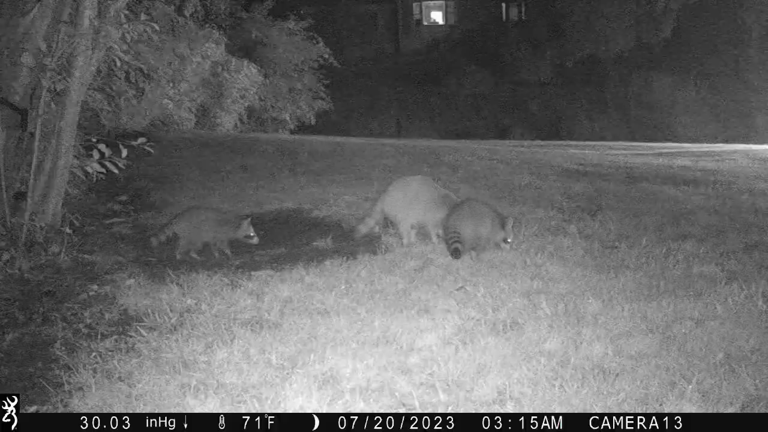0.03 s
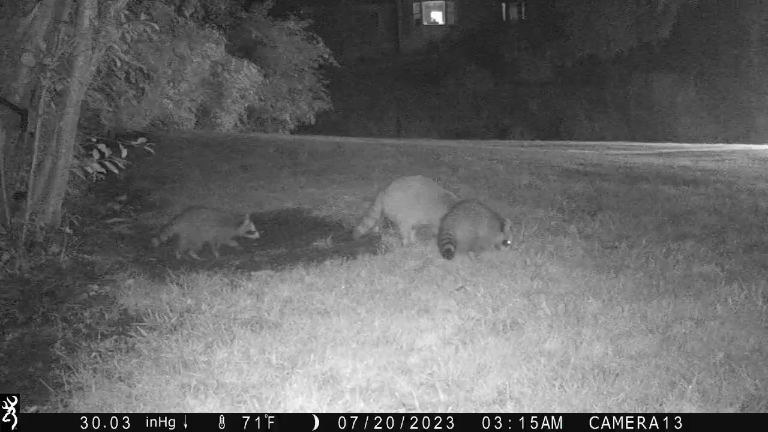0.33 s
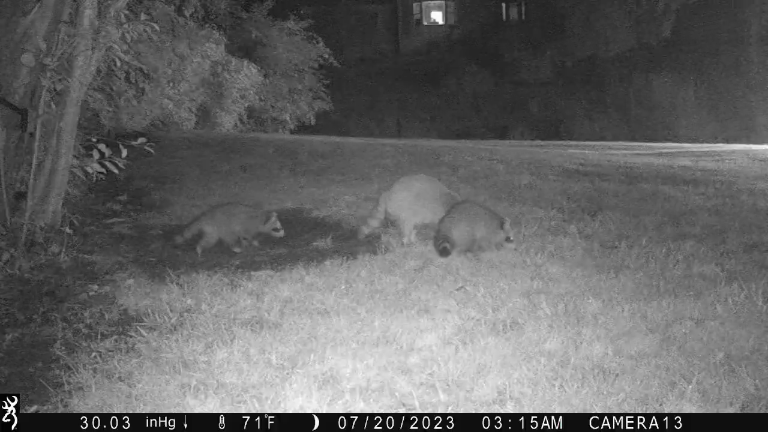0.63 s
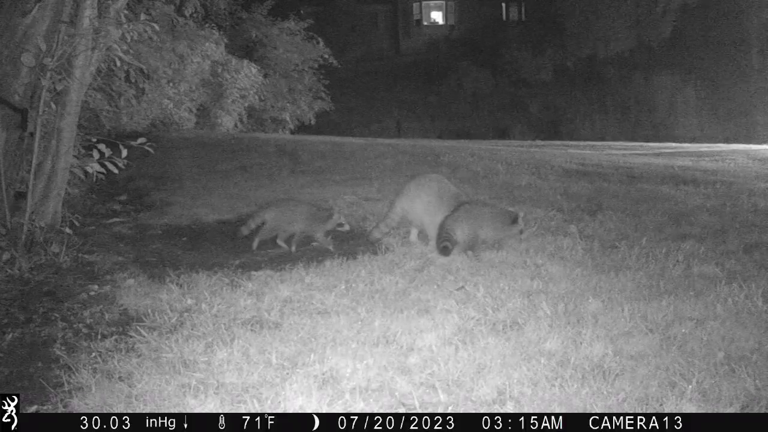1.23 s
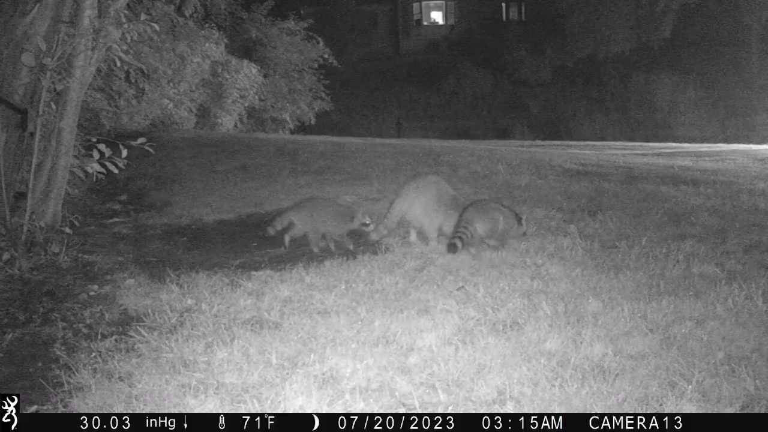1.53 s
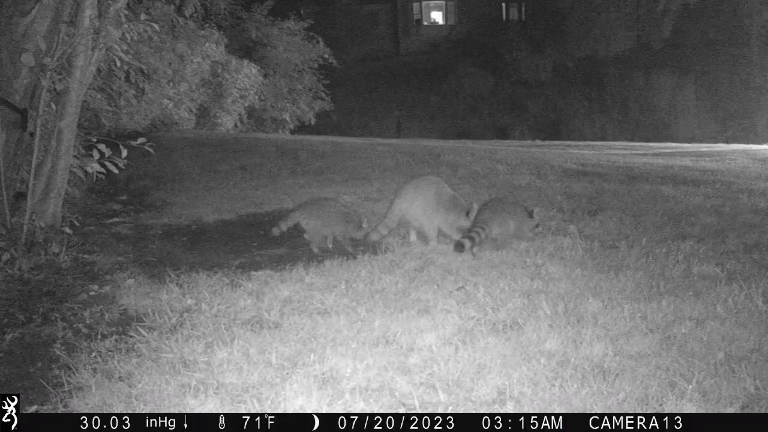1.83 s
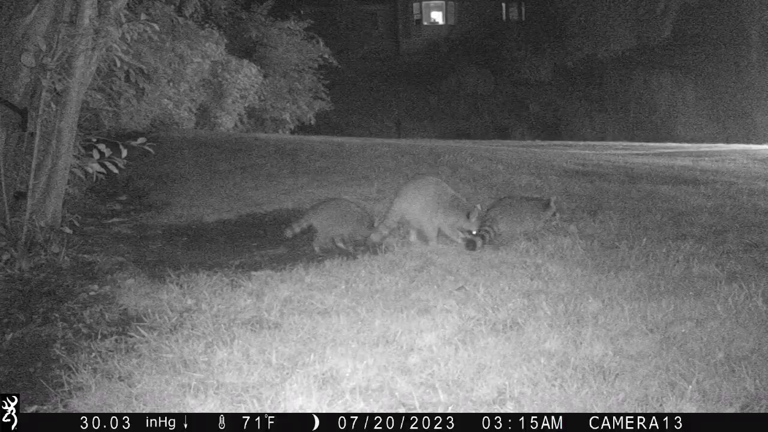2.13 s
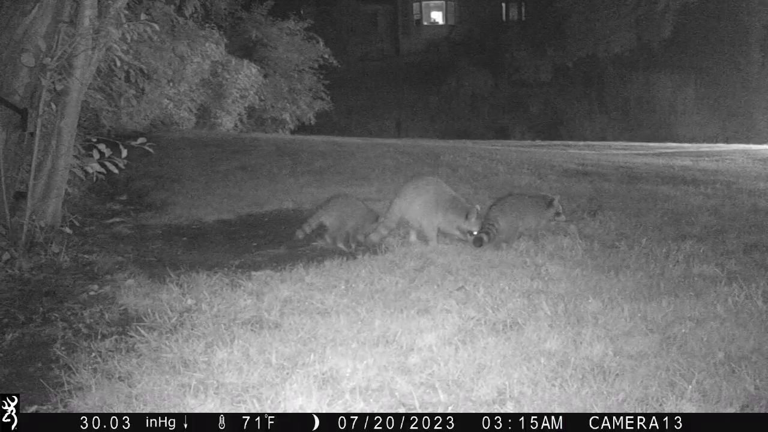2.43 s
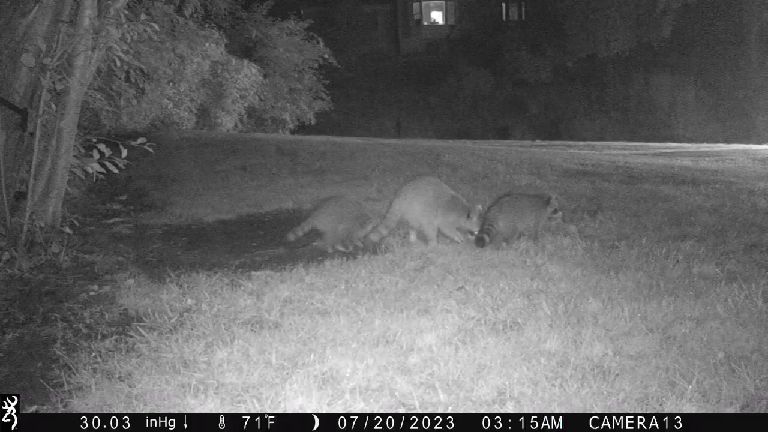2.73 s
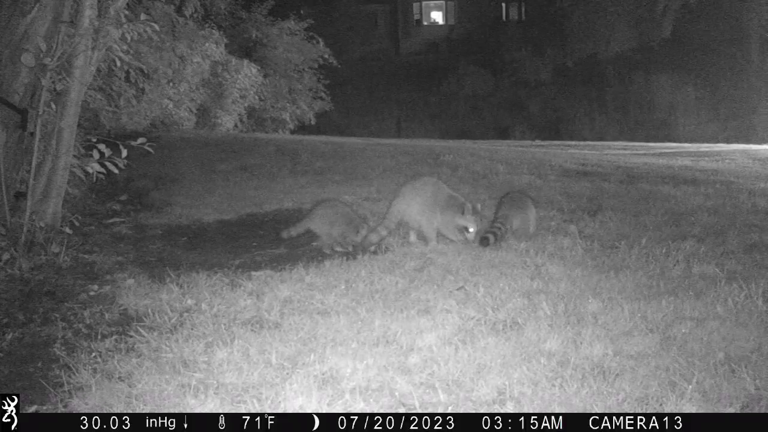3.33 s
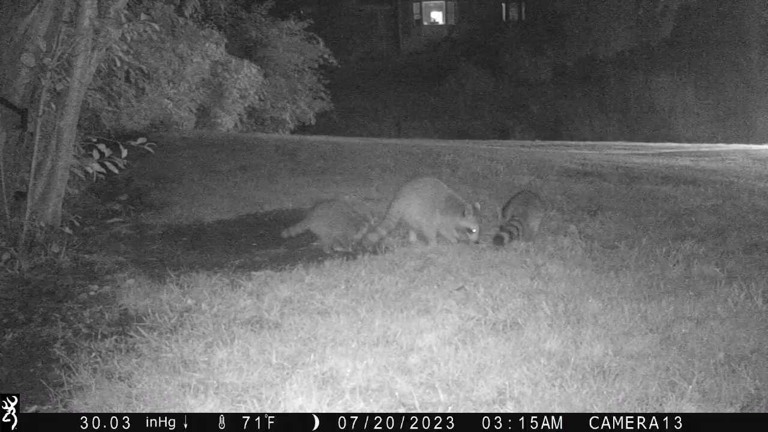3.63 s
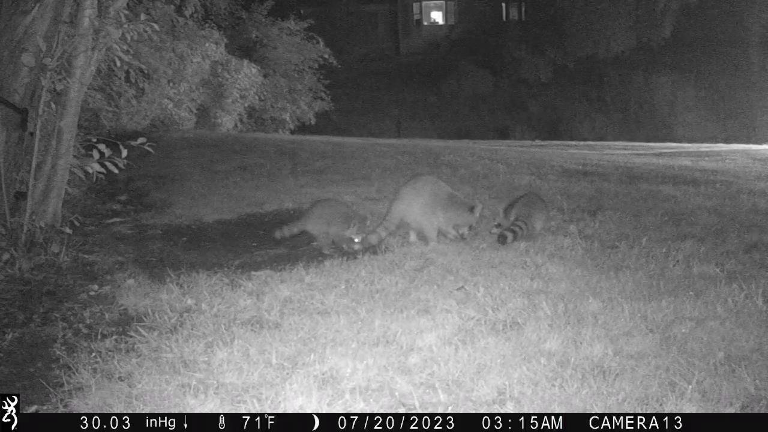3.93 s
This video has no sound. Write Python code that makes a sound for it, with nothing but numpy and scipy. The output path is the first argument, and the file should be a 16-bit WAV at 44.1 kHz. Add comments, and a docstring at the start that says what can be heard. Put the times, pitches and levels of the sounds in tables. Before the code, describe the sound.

A steady rush of distant air and microphone hiss hangs over a lawn at night. Beneath it, a faint cricket chirps about twice a second and a fainter one answers. Past halfway, foraging raccoons briefly tick and rustle the grass.

```python
"""Lawn at night

An even rush of distant air and microphone hiss; a far insect chorus blurs into a high band.
Foraging raccoons make a faint tick and rustle in the grass.
One cricket chirps about twice a second in runs of wing strokes; a fainter one answers."""
import sys
import numpy as np
from scipy import signal
from scipy.fft import rfft, irfft, next_fast_len
from scipy.io import wavfile
from scipy.ndimage import map_coordinates

SR = 44100
rng = np.random.default_rng(int(sys.argv[2]) if len(sys.argv) > 2 else 0)


def put_to_file(sound):
    """Save the sound as 16-bit audio at rate SR, in the file named by the first command-line argument."""
    columns = np.atleast_2d(sound).T  # one column per channel
    safe = np.clip(columns, -1, 1)
    whole_steps = np.round(safe * 32767)
    wavfile.write(sys.argv[1], SR, whole_steps.astype(np.int16))


N = 176400


def amp(db):
    """Decibels to gain."""
    return 10 ** (np.asarray(db) / 20)


def unit(x):
    """Scale to rms 1."""
    return x / np.sqrt(np.mean(x ** 2) + 1e-20)


def filtered(x, response):
    """Zero-phase filter with gain response(hz)."""
    n_fft = next_fast_len(N + SR // 2)
    hz = np.fft.rfftfreq(n_fft, 1 / SR)
    return irfft(rfft(x, n_fft) * response(hz), n_fft)[:N]


def noise(spectrum):
    """Noise of rms 1, shaped by (f/Hz, level/dB) points on a log frequency axis."""
    f_hz, level_db = np.transpose(spectrum)
    white = rng.standard_normal(N)
    return unit(filtered(white, lambda hz: amp(np.interp(np.log(hz + 1), np.log(f_hz + 1), level_db))))


def wobble(knots_per_s):
    """Smooth random curve through Gaussian knots."""
    knots = rng.standard_normal(N // 100)
    return map_coordinates(knots, [np.arange(N) * knots_per_s / SR], mode="wrap")


def tree_echo(x, t60_s=0.17, echo_db=-4):
    """Add a diffuse, fading echo; total power unchanged."""
    t = np.arange(SR // 2) / SR
    tail = rng.standard_normal(len(t)) * np.exp(-np.log(1000) * t / t60_s)
    echo = signal.fftconvolve(x, tail)[:N]
    return unit(unit(x) + amp(echo_db) * unit(echo)) * x.std()


def air(level_db=-35, waver_db=0.065):
    """Even rush of distant air and microphone hiss."""
    # rush spectrum: f/Hz, relative density/dB
    spectrum = [(20, -37), (35, -31), (76, -24), (150, -16), (300, -8), (520, -2.5), (850, 0), (1200, -0.5),
                (1700, -2.5), (2400, -6.5), (3200, -12.5), (4000, -17), (5000, -24), (6100, -28.5),
                (7400, -33.5), (10200, -34.5), (11100, -39), (12000, -57)]
    return amp(level_db + waver_db * wobble(knots_per_s=6.2)) * noise(spectrum)


def insect_chorus(level_db=-52.5, shimmer_db=0.32):
    """Many distant insects merge into a shimmering band."""
    # chorus spectrum: f/Hz, relative density/dB
    spectrum = [(3700, -42), (4150, -14), (4380, 2), (4520, -3.5), (4640, -3.5), (5000, -2), (5230, -0.5),
                (5450, 0), (5700, -11), (6200, -48)]
    return amp(level_db + shimmer_db * wobble(knots_per_s=40)) * noise(spectrum)


def grass(rise_s=0.001):
    """A stalk ticks and blades brush under a paw: two decaying noise bursts."""
    # paw contacts: t/s, decay/s, level/dB
    rustles = [(2.491, 0.0025, -37), (2.615, 0.096, -50.5)]
    # grass spectrum: f/Hz, relative density/dB
    spectrum = [(1500, -23), (3000, -9), (4200, 10), (5500, -1), (7000, -10), (11000, -32)]
    t, envelope = np.arange(N) / SR, np.zeros(N)
    for onset_s, decay_s, level_db in rustles:
        attack = np.clip((t - onset_s) / rise_s, 0, 1)
        envelope += amp(level_db) * attack * np.exp(-abs(t - onset_s) / decay_s)
    return envelope * noise(spectrum)


def cricket(chirps, pitch_hz, scatter_hz):
    """Chirps: swelling runs of wing strokes that climb to pitch; each stroke sags as the wing slows."""
    chirp_s, strokes_per_s = 0.183, 36
    climb_hz, sag_hz = 89.7, 110
    t, out = np.arange(N) / SR, np.zeros(N)
    for centre_s, level_db in chirps:
        stroke_phase = ((t - centre_s) * strokes_per_s + 0.5) % 1
        chirp_pos = np.clip(2 * (t - centre_s) / chirp_s, -1, 1)  # -1 start, +1 end
        swell = np.sqrt(1 - chirp_pos ** 2)
        hz = pitch_hz - climb_hz * np.minimum(chirp_pos, 0) ** 2
        hz -= sag_hz * np.maximum(2 * stroke_phase - 1, 0)
        hz += scatter_hz * wobble(knots_per_s=67)
        pulses = np.sin(np.pi * stroke_phase) ** 2
        tone = unit(pulses * np.sin(2 * np.pi * np.cumsum(hz) / SR))
        out += tree_echo(amp(level_db) * swell * tone)
    return out


def cricket_pair():
    """A near cricket and a fainter one alternate at almost the same pitch."""
    # near chirps: centre t/s, level/dB
    chirps = [(.08, -52), (.615, -51.5), (1.125, -52), (1.76, -51), (2.275, -51.5), (2.855, -52.5),
              (3.41, -54), (3.97, -54.5)]
    # answering chirps: centre t/s, level/dB
    answers = [(.3, -62), (.82, -63), (1.38, -57), (1.95, -61), (2.55, -59.5), (3.09, -63), (3.67, -57)]
    near = cricket(chirps, pitch_hz=4532, scatter_hz=10.3)
    far = cricket(answers, pitch_hz=4536, scatter_hz=5.7)
    return near + far


def scene():
    """Mono sum of all sources."""
    return (cricket_pair() + air() + insect_chorus() + grass())[None]


def record(dry):
    """Brief opening silence, then a brick-wall low-pass."""
    start_s, cutoff_hz = 0.036, 12250
    gate = np.arange(N) / SR >= start_s
    return filtered(dry[0] * gate, lambda hz: hz < cutoff_hz)[None]


dry = scene()
out = record(dry)
put_to_file(out)
```